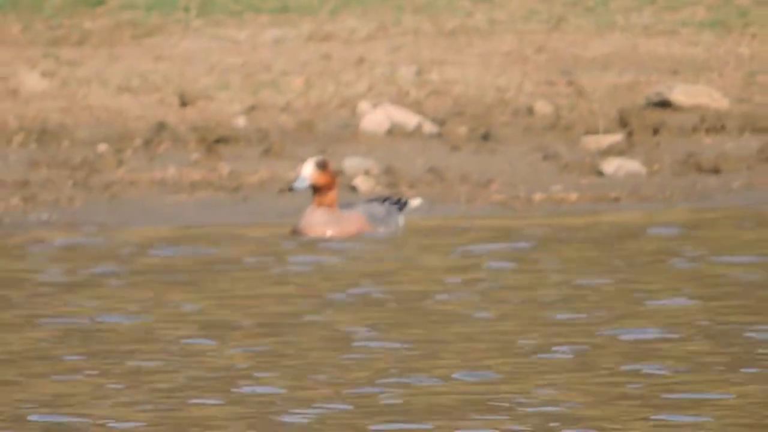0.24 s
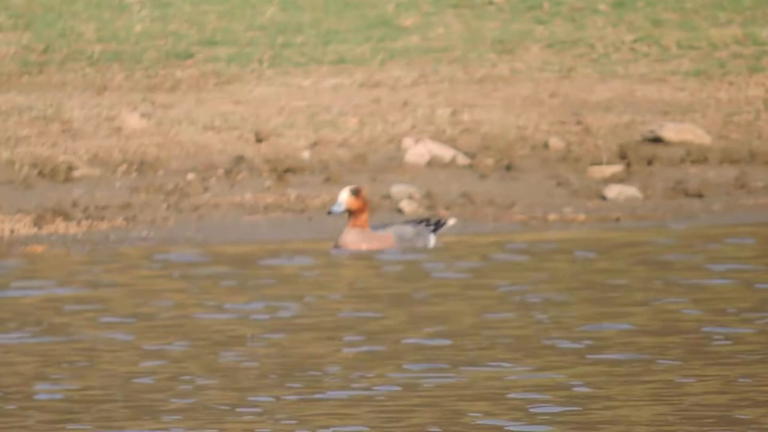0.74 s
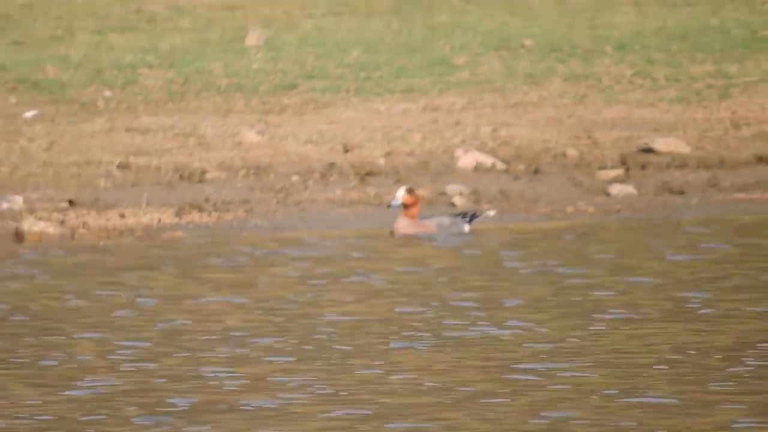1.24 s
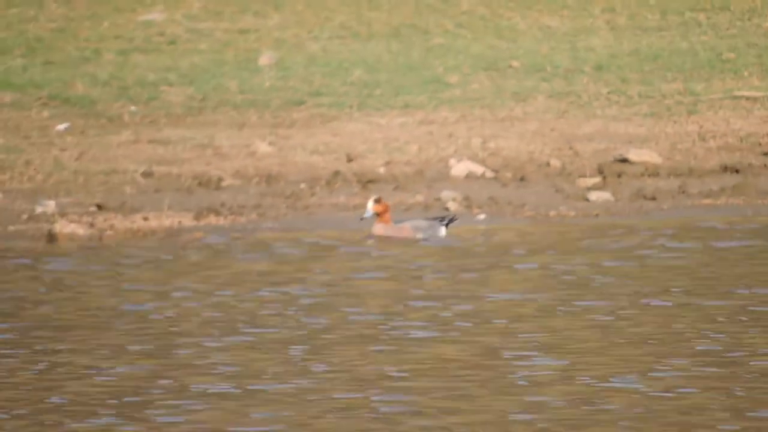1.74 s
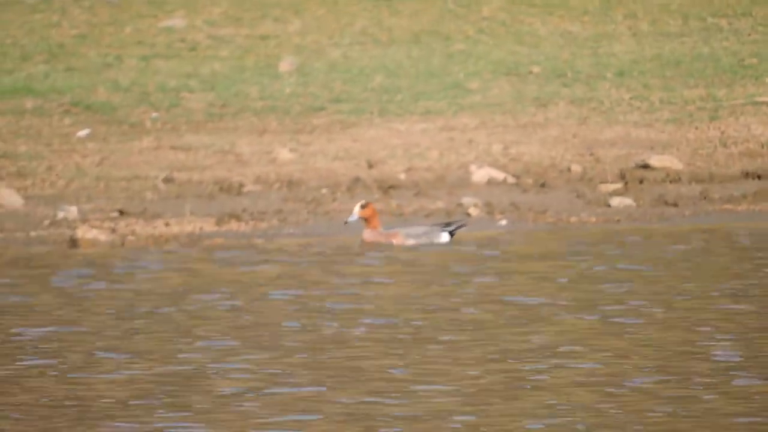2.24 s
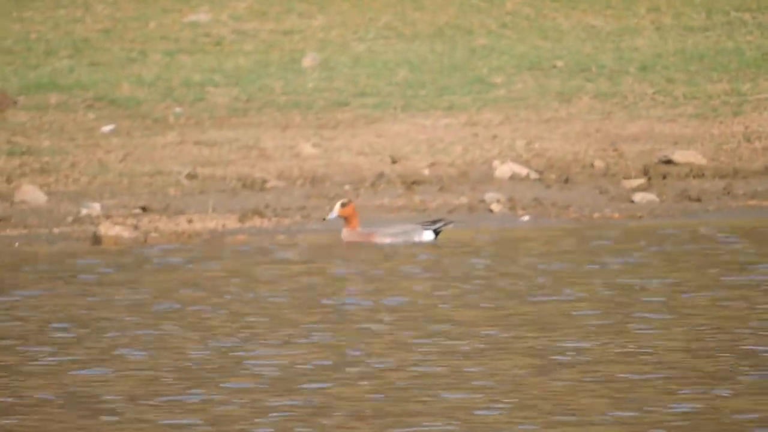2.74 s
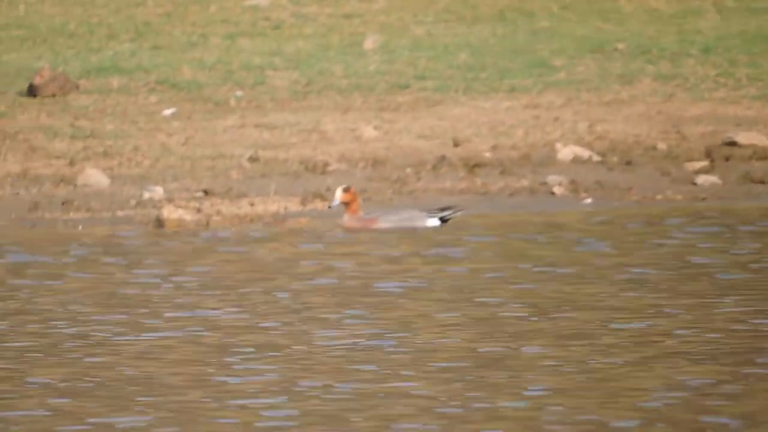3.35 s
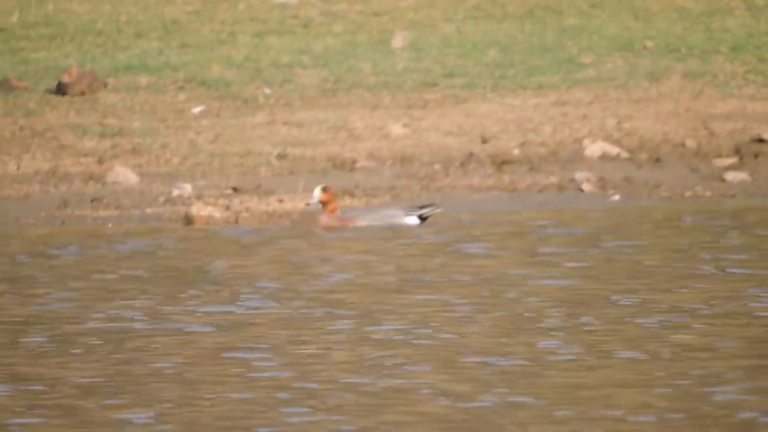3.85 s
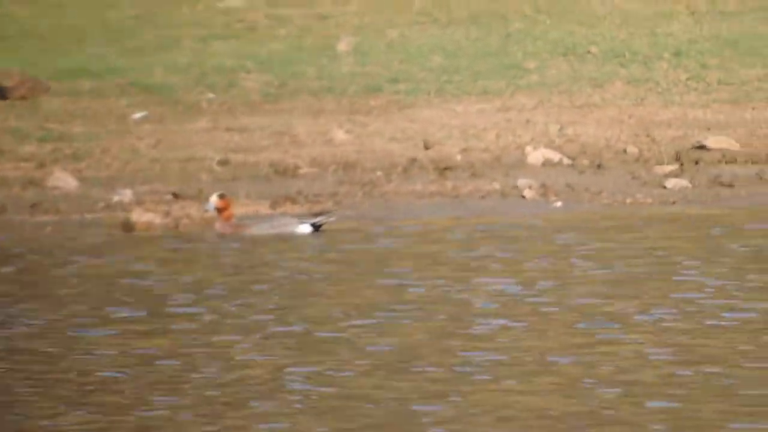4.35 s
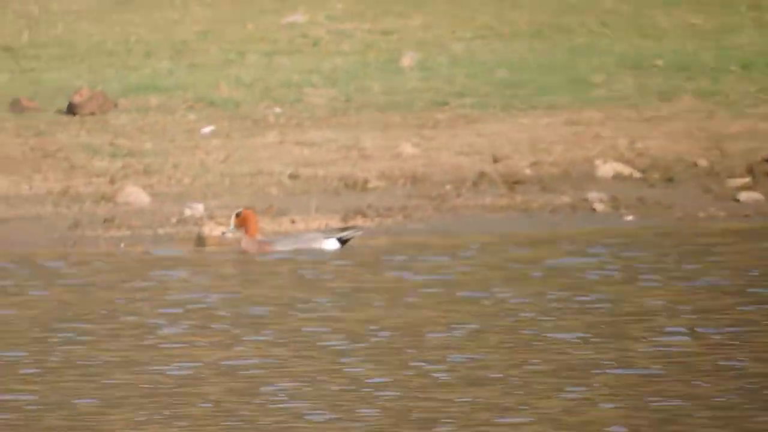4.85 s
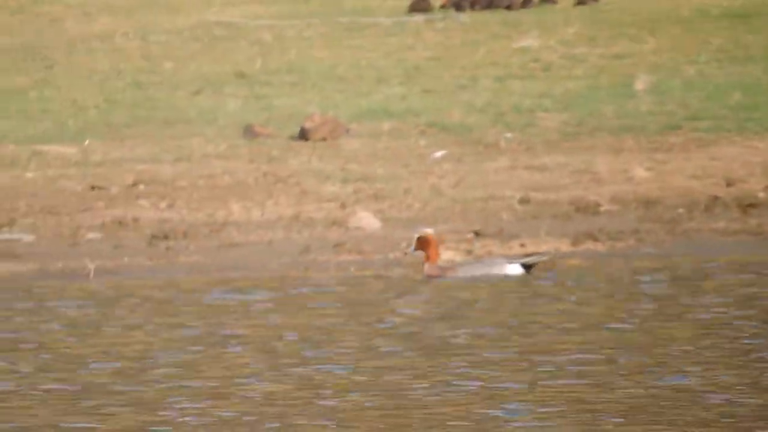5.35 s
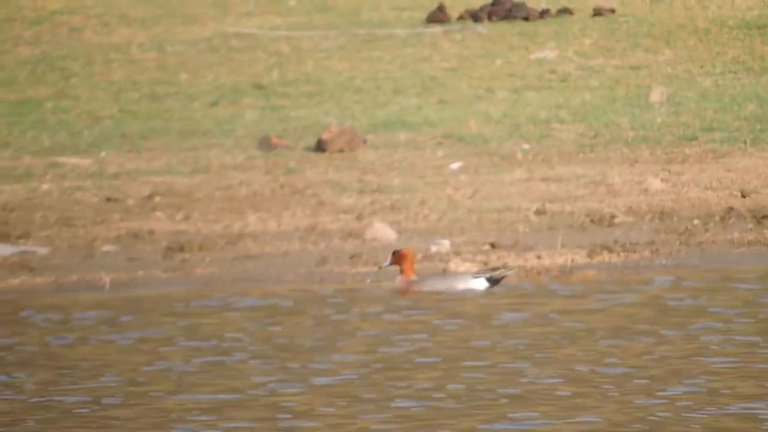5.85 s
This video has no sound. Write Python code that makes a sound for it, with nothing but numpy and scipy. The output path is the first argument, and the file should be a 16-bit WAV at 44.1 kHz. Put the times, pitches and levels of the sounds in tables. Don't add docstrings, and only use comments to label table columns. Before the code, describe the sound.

Outdoors by open water, a camera microphone picks up repeated piping duck whistles around a middle-high pitch, busiest at the start when two birds overlap. Phrases of about three short notes lead to a bending-down note with a tiny upturn. Wind rumbles briefly around one and a half seconds, then buffets strongly in the later half as the calls soften. Light ticks, constant hiss and a faint distant flock murmur near the end.

```python
import sys
import numpy as np
from scipy import signal
from scipy.fft import rfft, irfft, next_fast_len
from scipy.io import wavfile
from scipy.ndimage import uniform_filter1d, map_coordinates

SR = 44100
rng = np.random.default_rng(int(sys.argv[2]) if len(sys.argv) > 2 else 0)


def voltage_ratio(level):
    return 10 ** (np.asarray(level, float) / 20)


def master_out(mix):
    frames = np.transpose(np.atleast_2d(mix))
    ceiling = np.clip(frames, -1, 1)
    pcm = np.round(ceiling * 32767).astype(np.int16)
    wavfile.write(sys.argv[1], SR, pcm)


N = 268701


def unit(x):
    return x / np.sqrt(np.mean(x ** 2) + 1e-20)


def along(points, hz, axis=1):
    table = np.transpose(points)
    return np.interp(np.log(hz + 1), np.log(table[0] + 1), table[axis])


def wobble(rate, size=N):
    knots = rng.standard_normal(int(size * rate / SR) + 4)
    return map_coordinates(knots, [np.arange(size) * rate / SR])


def slide(share):
    return np.sin(np.pi / 2 * np.clip(share, 0, 1)) ** 2


def filtered(x, response):
    m = next_fast_len(N + SR // 2)
    return irfft(rfft(x, m) * response(np.fft.rfftfreq(m, 1 / SR)), m)[..., :N]


# t/s, left level/dB, right level/dB
BREEZE = [(0.0, -49.5, -42), (0.5, -48.5, -44.5), (0.7, -53.5, -52.5), (0.9, -49, -47), (1.25, -53, -51),
          (1.45, -55, -30), (1.85, -54, -42), (2.1, -52.5, -54), (2.6, -51.5, -50), (2.85, -41.5, -26),
          (3.4, -42.5, -36.5), (3.6, -43.5, -26.5), (4.15, -34.5, -45), (4.55, -37.5, -36.5),
          (5.3, -45, -35.5), (5.45, -37.5, -46), (5.8, -48, -36), (6.09, -54, -31.5)]
# t/s, peak level/dB, left minus right/dB
EDDIES = [(0.187, -39, -16), (0.413, -43, -6.0), (1.38, -46, -7), (1.437, -32, -28.5), (1.633, -29, -25),
          (1.728, -26, -30), (1.802, -35.5, -24.0), (2.749, -31, -17.0), (2.844, -17.5, -28.5),
          (3.019, -24, -29), (3.096, -38, -23.0), (3.207, -30.5, -13.5), (3.349, -37, -21),
          (3.451, -22.5, -9.5), (3.594, -22.5, -26), (3.765, -26.5, -23), (3.901, -21, -19),
          (3.95, -24.5, -19), (4.046, -39, -17), (4.167, -45, -4), (4.27, -24, -19), (4.47, -21, -27),
          (4.754, -33.5, -20), (4.947, -25, -25), (5.057, -25.5, -23), (5.13, -34, -3), (5.231, -20.5, -15),
          (5.597, -28.5, -19.5), (5.811, -25.5, -37), (5.987, -28.5, -26)]
EDDY_RISE_S, EDDY_DIES_DB_PER_S, EDDY_OFFSET_DB = 0.01198, 108, -0.5


def gusts():
    s, *levels = np.transpose(BREEZE)
    t = np.arange(0, N + 64, 64) / SR
    power = voltage_ratio(2 * np.array([np.interp(t, s, level) for level in levels]))
    for start, db, left_right_db in EDDIES:
        late = t - start
        shape = slide(late / EDDY_RISE_S + .5) * voltage_ratio(-EDDY_DIES_DB_PER_S * np.maximum(late, 0))
        port_db = db + EDDY_OFFSET_DB + np.array([[left_right_db], [0]])
        power = power + (voltage_ratio(port_db) * shape) ** 2
    return [np.interp(np.arange(N) / SR, t, 10 * np.log10(port)) for port in power]


# f/Hz, level/dB
EDDY_COLOUR = [(10, -35), (28, 1.5), (50, 4), (120, 0), (200, -10), (300, -24.5), (450, -45), (800, -140)]
EDDY_BLOW_DB = 5
LEFT_DULL_DB_PER_OCTAVE = -4


def wind(levels):
    out = []
    for gust_db, onset_db in zip(levels, (-32, -38)):
        hits = (rng.random(N) < 60 / SR) * rng.standard_normal(N) * voltage_ratio(7.0 * rng.standard_normal(N))
        blows = [round((s + EDDY_RISE_S) * SR) for s, *_ in EDDIES]
        hits[blows] = -voltage_ratio(EDDY_BLOW_DB)
        thumps = unit(filtered(hits, lambda hz: 1j * voltage_ratio(along(EDDY_COLOUR, hz))))
        rumble = unit(filtered(rng.standard_normal(N),
                               lambda hz: voltage_ratio(along(EDDY_COLOUR, hz) - 5.8 * np.log2(hz / 50 + 1))))
        mix = voltage_ratio(0.36 * (gust_db - onset_db)) * thumps + rumble
        mix = mix / np.sqrt(np.abs(uniform_filter1d(mix ** 2, SR // 12)) + 1e-9)
        out.append(voltage_ratio(gust_db) * mix)
    left, right = out
    left = filtered(left, lambda hz: voltage_ratio(LEFT_DULL_DB_PER_OCTAVE * np.log2(hz / 110 + 0.33)))
    return np.array([left, right])


# f/Hz, level per Hz/dB
AIR = [(120, -38), (200, -3.5), (346, -4.5), (900, -12), (1070, -10), (1300, -14), (2700, -15.5),
       (12000, -27.5), (15700, -33.5)]
# f/Hz, left minus right/dB
AIR_BALANCE = [(60, 4), (240, -1), (950, 7), (3770, -2), (15000, 0.5)]
# f/Hz, likeness [0 to 1]
AIR_ALIKE = [(300, 0.45), (3000, 0.28), (8000, 0.4)]
AIR_DB = -60


def air(right_db):
    def response(hz):
        turn = np.arccos(np.clip(along(AIR_ALIKE, hz), -1, 1)) / 2
        return voltage_ratio(along(AIR, hz)) * np.array([np.cos(turn), np.sin(turn)])

    def tilt(hz):
        return voltage_ratio(np.array([1, -1])[:, None] * along(AIR_BALANCE, hz) / 2)

    gust_db = right_db + 69.0
    mid, side = filtered(rng.standard_normal((2, N)), response)
    hiss = unit(filtered(np.array([mid + side, mid - side]), tilt))
    return voltage_ratio(AIR_DB + 3.0 + wobble(3.005) + 0.036 * gust_db) * hiss


def whistle(rows, voice, stutter, pop_db):
    s, pitch, level = np.transpose(rows)
    breaks, first_ms, spacing_ms = (*np.atleast_1d(stutter), 0, 0)[:3]
    h1_db, h3_db, h4_db = voice
    t = np.arange(int((s[-1] - s[0] + 0.0019) * SR)) / SR
    size = len(t)
    dip, pop = np.zeros(size), np.zeros(size)
    for k in range(int(breaks)):
        late = t * 1000 - first_ms - k * spacing_ms - rng.normal(0, 0.28)
        fading = 1 - .5 * k / breaks
        dip += np.exp(-np.abs(late / np.where(late < 0, 3.6, 2.2)) ** 3) * fading
        pop_size = voltage_ratio(rng.normal(0, 2.2) - 2 * (k / breaks) ** 2)
        pop += pop_size * np.exp(-((late - 3.2) / 1.7) ** 2)
    edges = np.clip(t / 0.00065, 0, 1) * np.clip((t[-1] - t) / 0.0045, 0, 1) ** 2

    risen = s[1] if breaks and s[1] - s[0] < .031 else s[0]
    steps = np.where(t * 1000 < first_ms, s[0], np.maximum(t + s[0], risen))
    glide = uniform_filter1d(np.interp(steps, s, pitch), SR // 120, mode="nearest")
    sag = 1 - 0.0359 * dip + 0.00937 * wobble(114, size=size)
    phase = 2 * np.pi * np.cumsum(glide * sag) / SR

    slack = 36 * (1 - glide / np.maximum.accumulate(glide))
    stuttering = t * 1000 < first_ms + breaks * spacing_ms + 15
    rasp = 0.43 * stuttering + 0.11
    upper_db = [h4_db + db for db in (0, -6.5, -7.5, -19.5, -26, -27.5)]
    tone = 0
    for k, db in enumerate([h1_db, 0, h3_db, *upper_db]):
        sway_db = 1.41 * wobble(66.6, size=size)
        flutter_db = rasp * (k + 2.5) * wobble(302.3, size=size)
        overtone = np.sin((k + 1) * phase + 2 * np.pi * rng.random())
        tone = tone + voltage_ratio(db - max(k - 1, 0) * slack + sway_db + flutter_db) * overtone
    crack = voltage_ratio(pop_db) * pop * wobble(970, size=size) * np.sin(2.27 * phase)
    loudness = voltage_ratio(np.interp(t + s[0], s, level) + 6.0)
    return loudness * edges * (voltage_ratio(-26 * dip) * tone + crack)


def duck(notes, pops, moves_s):
    out = np.zeros((2, N + SR))
    for rows, voice, stutter in notes:
        start = rows[0][0]
        moved = int(start > moves_s)
        note = whistle(rows, voice, stutter, pops[moved])
        out[moved, round(start * SR):][:len(note)] += note
    return out[:, :N]


def stutter_rhythm(count):
    return count, 10.9 + rng.normal(0, 1.67), 13.8 + rng.normal(0, 0.75)


RISE_S = 0.0217


def shorts(notes, voice_db, arch, ms_per_break):
    start_share, start_db, droop, end_db = arch
    h1_db, h4_db = voice_db
    gone = np.linspace(0, 1, num=5)
    out = []
    for s, length, hz, db, h3_db in notes:
        times = s + RISE_S + gone * (length - RISE_S)
        drooping = np.transpose([times, hz * (1 - droop * gone ** 2.43), db + end_db * gone])
        rows = [(s, hz * start_share, db + start_db), *drooping]
        out.append((rows, (h1_db, h3_db, h4_db), stutter_rhythm(round(length * 1000 / ms_per_break))))
    return out


def longs(notes, voice_db, shape, moves_s, count):
    slide_s, tail_s, late, droop, start_share, start_db, *fade_db = shape
    out = []
    for s, length, hz, end_hz, db in notes:
        t = np.r_[RISE_S, np.linspace(max(length - slide_s, RISE_S + 1e-3), length, num=13)]
        share = np.maximum(t - t[1], 0) / (length - tail_s - t[1])
        down = slide(np.abs(share) ** late)
        held_hz = hz * (1 - droop * (t - RISE_S))
        level = db + fade_db[int(s > moves_s)] * down
        sliding = np.transpose([s + t, held_hz + (end_hz - held_hz) * down, level])
        rows = [(s, hz * start_share, db + start_db), *sliding]
        out.append((rows, voice_db, stutter_rhythm(count(length * 1000))))
    return out


def glides(notes, voice_db, bend, start_db, end_db):
    gone = np.linspace(0, 1, num=7)
    bent = gone ** bend
    out = []
    for s, length, from_hz, to_hz, db in notes:
        level = db + start_db * (1 - gone) + end_db * bent
        out.append((np.transpose([s + length * gone, from_hz + (to_hz - from_hz) * bent, level]), voice_db, 0))
    return out


FLICK_START_DB, FLICK_BEND = -6.5, 1.4
CHIRP_END_DB, CHIRP_BEND = -6.5, 2.22

# t/s, length/s, start f/Hz, end f/Hz, level/dB
SECOND_CHIRP = [
    (0.0, 0.01, 1350, 1290, -44),
    (0.605, 0.044, 1316, 1080, -48),
    (2.465, .032, 1252, 1220, -50),
    (2.515, 0.039, 1325, 1020, -47.5),
    (3.71, 0.034, 1248, 1250, -49),
    (3.76, 0.036, 1320, 1120, -45.5),
]
# t/s, length/s, top f/Hz, level/dB, 3rd harmonic over the 2nd/dB
SECOND_SHORT = [
    (0.06, .075, 1443, -43.5, -8.5),
    (0.745, 0.061, 1356, -42.5, -10),
    (0.888, 0.09, 1350, -41.5, -9),
    (3.93, 0.05, 1324, -46, -4),
]
# t/s, length/s, top f/Hz, end f/Hz, level/dB
SECOND_LONG = [
    (0.186, 0.24, 1445, 918, -41.5),
    (1.075, 0.14, 1338, 963, -45),
    (2.815, .232, 1362, 955, -45),
    (4.086, 0.21, 1328, 965, -46),
]
# t/s, length/s, start f/Hz, end f/Hz, level/dB
SECOND_FLICK = [
    (0.39, .075, 1160, 1500, -55),
    (1.232, 0.039, 1295, 1625, -55),
    (3.045, 0.037, 1248, 1520, -57.5),
    (4.29, 0.033, 1283, 1570, -56),
]


def second_duck():
    moves_s = .5
    chirps = glides(SECOND_CHIRP, (-23.5, -5, -14), CHIRP_BEND, 0, CHIRP_END_DB)
    short = shorts(SECOND_SHORT, (-21.5, -16), (.985, -2.5, .045, -1.5), ms_per_break=19)
    shape = (.125, .015, 1.05, .3, .99, -2.5, -15, -6)
    held = longs(SECOND_LONG, (-23, -9, -13), shape, moves_s, count=lambda ms: round((ms - 70) / 14))
    flicks = glides(SECOND_FLICK, (-4, -9, -19), FLICK_BEND, FLICK_START_DB, 0)
    return duck(short + flicks + held + chirps, (-13, -3.5), moves_s)


# t/s, length/s, start f/Hz, end f/Hz, level/dB
FAR_CHIRP = [
    (0.105, 0.075, 1203, 1110, -66.5),
    (0.856, .026, 1140, 1060, -74),
]


def far_bird():
    chirps = glides(FAR_CHIRP, (-12, 4, 4.5), CHIRP_BEND, 0, CHIRP_END_DB)
    return duck(chirps, (0, 0), N / SR)[0]


# t/s, length/s, top f/Hz, level/dB, 3rd harmonic over the 2nd/dB
FIRST_SHORT = [(0.172, 0.046, 1386, -44.5, 0), (0.27, 0.06, 1394, -41.5, -1),
               (0.38, 0.065, 1422, -42.5, 1.5), (0.96, 0.039, 1300, -46, -2), (1.06, 0.05, 1398, -42, 0),
               (1.168, 0.064, 1386, -42, -2.5), (1.592, 0.047, 1364, -44, -4),
               (1.695, 0.056, 1380, -43.5, -4), (1.81, 0.066, 1386, -41.5, -7.5),
               (2.315, 0.041, 1290, -49, -6), (2.42, .046, 1412, -44, -0.5),
               (2.533, .067, 1400, -45.5, -.6), (3.268, 0.063, 1307, -47.5, -14),
               (3.382, 0.06, 1310, -48.5, -5.5), (3.497, .071, 1332, -47.5, -5),
               (4.158, 0.056, 1268, -44.5, -11), (4.272, 0.061, 1306, -46.5, -7.5),
               (4.39, 0.07, 1326, -45.5, -3), (5.0, 0.036, 1232, -49, -11), (5.105, 0.049, 1298, -49, -4.5),
               (5.22, 0.069, 1321, -48, -4.5), (5.98, 0.043, 1228, -51, -14)]
# t/s, length/s, top f/Hz, end f/Hz, level/dB
FIRST_LONG = [
    (0.5, 0.13, 1345, 1038, -42),
    (1.29, .146, 1348, 1063, -44),
    (1.938, 0.14, 1346, 965, -43.5),
    (2.66, 0.13, 1337, 980, -41),
    (3.635, .118, 1232, 1000, -49),
    (4.517, 0.17, 1300, 1031, -47),
    (5.362, .126, 1242, 944, -51),
]
# t/s, length/s, start f/Hz, end f/Hz, level/dB
FIRST_FLICK = [
    (0.632, 0.036, 1043, 1110, -53),
    (1.43, 0.0276, 1432, 1660, -45.5),
    (2.06, 0.042, 1293, 1654, -47.5),
    (2.804, 0.016, 1450, 1570, -52),
    (3.75, .038, 1316, 1660, -50.5),
    (4.67, 0.027, 1330, 1500, -52.5),
    (5.485, 0.028, 1313, 1490, -50.5),
]


def first_duck():
    moves_s = 3.2
    short = shorts(FIRST_SHORT, (-10.5, -10.5), (.945, -4.5, .025, -2.5), ms_per_break=28)
    shape = (.115, -.008, 1.3, .5, .97, -4, -15, -2.5)
    held = longs(FIRST_LONG, (-14, -8, -12), shape, moves_s, count=lambda ms: round(ms / 50))
    flicks = glides(FIRST_FLICK, (-1.5, -11, -31), FLICK_BEND, FLICK_START_DB, 0)
    return duck(short + flicks + held, (-11, -10.5), moves_s)


def ports(x, side):
    def half(hz):
        lead = along(side, hz, axis=2) / 2 * (hz > 300)
        return voltage_ratio(along(side, hz) / 2) * np.exp(1j * lead)
    return filtered(x, lambda hz: np.array([half(hz), 1 / half(hz)]))


# f/Hz, left minus right/dB, left lead [radians]
FIRST_SIDE = [(1380, 2.5, -1.3), (2140, -8.5, -1), (2520, 0.5, -1.5), (3746, 4, -3), (4850, -8, -4.5),
              (6730, -3, -8), (8240, -3.5, -4.5)]
FIRST_TURNED = [(1350, 4.5, -1.6), (2050, -2, -2.1), (2700, 5, -2.1), (4000, 9, -4), (5300, -12, -5.3),
                (7500, -6, -6.7)]
SECOND_SIDE = [(1380, 23.5, -2.4), (2010, -11.5, -1.5), (2940, -5.5, -6), (3620, 5.5, -0.5),
               (4830, -13, -6.5), (8600, -1.5, -5)]


def birds():
    beside, aside = second_duck()
    far = far_bird()
    first, turned = first_duck()
    return ports(first + beside + far, FIRST_SIDE) + ports(turned, FIRST_TURNED) + ports(aside, SECOND_SIDE)


def bank(x):
    t = np.arange(SR // 2) / SR
    tail = rng.standard_normal((2, len(t))) * voltage_ratio(-60 * t / 0.37) * (t > .004)
    slap = np.pad(x, ((0, 0), (round(0.035 * SR), 0)))[:, :N]
    scattered = signal.fftconvolve(x, tail / np.linalg.norm(tail[0]), axes=1)[:, :N]
    return voltage_ratio(-25.5) * slap + voltage_ratio(-15.0) * scattered


# t/s, peak level/dB, snap over peak/dB
TICKS = [(0.435, -48, -10), (0.607, -49.5, -28), (1.282, -50, -13), (2.532, -52.5, -15), (2.681, -50, -8),
         (2.786, -52.5, -19), (3.154, -46.5, -10), (3.29, -46.5, -13), (3.426, -45, -13), (3.854, -45, -2),
         (3.877, -40.5, 4.5), (4.286, -44, -19)]


def ticks():
    out = np.zeros((2, N + SR))
    t = np.arange(SR // 20) / SR
    for s, db, snap_db in TICKS:
        shell = 0
        for hz, level, t60 in [(1080, 11.5, 0.007), (1500, 5, 0.005), (450, 2.4, 0.01)]:
            ring_hz = hz * (1 + rng.normal(0, 0.084))
            shell = shell + voltage_ratio(level - 60 * t / t60) * np.sin(2 * np.pi * ring_hz * t)
        shell = shell * voltage_ratio([[3], [-6]]) * (1 - np.exp(-t / 0.0021))
        snap = voltage_ratio(snap_db - 60 * t / 0.015) * rng.standard_normal((2, len(t))) * voltage_ratio([[-5], [3]])
        snap = uniform_filter1d(snap, size=2) * (1 - np.exp(-t / 0.0004))
        out[:, round(s * SR):][:, :len(t)] += voltage_ratio(db + 13) * (shell + snap)
    return out[:, :N]


# t/s, level/dB
FLOCK = [
    (4.88, -80),
    (4.93, -60),
    (5.09, -60),
    (5.14, -67),
    (5.3, -61),
    (5.55, -63),
    (5.85, -72),
]


def flock():
    s, level = np.transpose(FLOCK)
    band = filtered(rng.standard_normal((2, N)), lambda hz: np.exp(-((hz - 2000) / 500) ** 2))
    murmur_db = np.interp(np.arange(N) / SR, s, level, -120, -120)
    return voltage_ratio(murmur_db + 2.5 * wobble(28)) * unit(band)


def scene():
    gust_db = gusts()
    calls = birds()
    return wind(gust_db) + air(gust_db[1]) + calls + bank(calls) + ticks() + flock()


def band_limit(x):
    return signal.sosfilt(signal.butter(12, 16440, fs=SR, output="sos"), x)


def record(dry):
    top_hz = 15830
    return band_limit(filtered(dry, lambda hz: hz < top_hz))


dry = scene()
out = record(dry)
master_out(out)
```